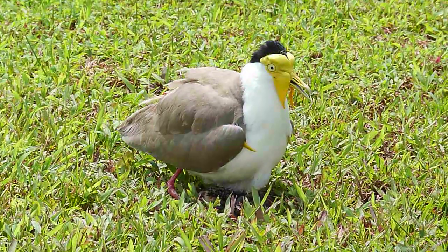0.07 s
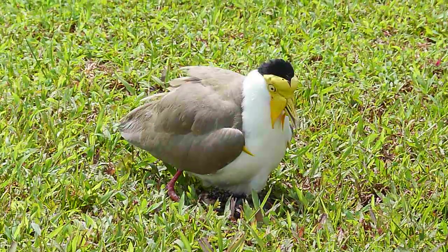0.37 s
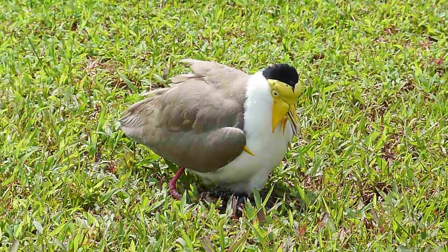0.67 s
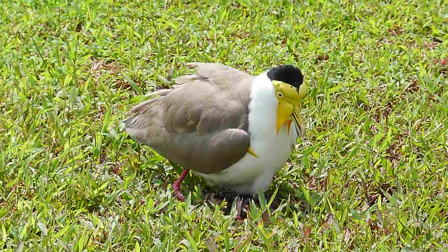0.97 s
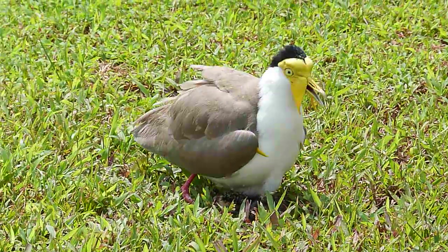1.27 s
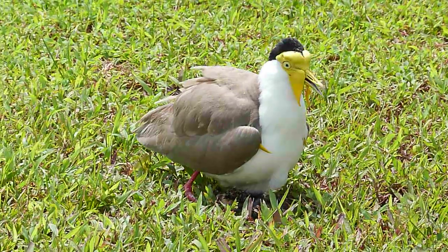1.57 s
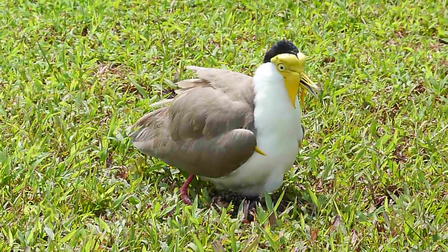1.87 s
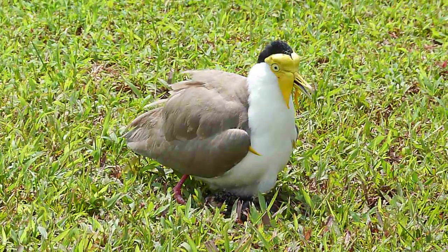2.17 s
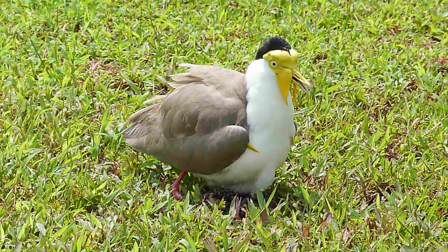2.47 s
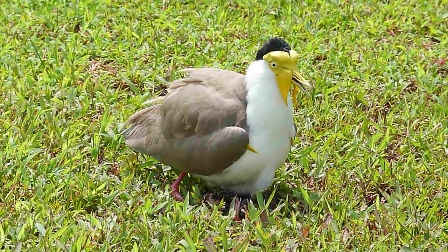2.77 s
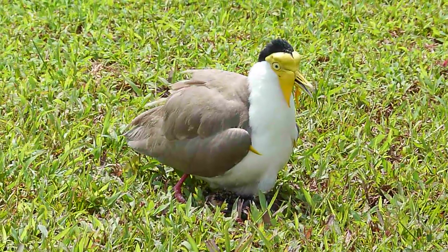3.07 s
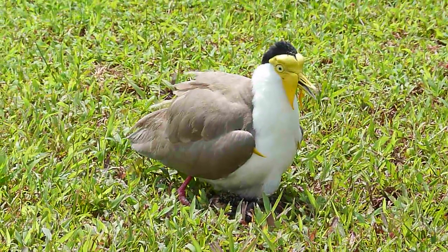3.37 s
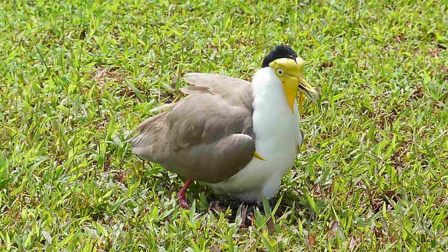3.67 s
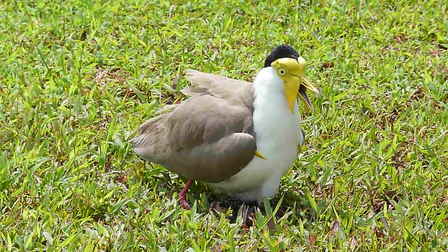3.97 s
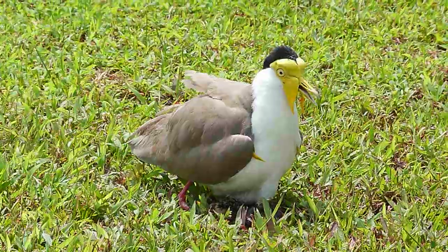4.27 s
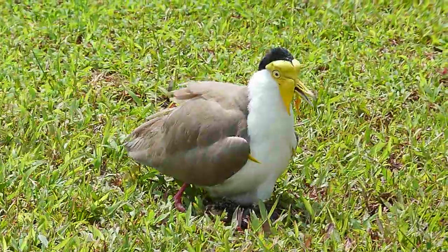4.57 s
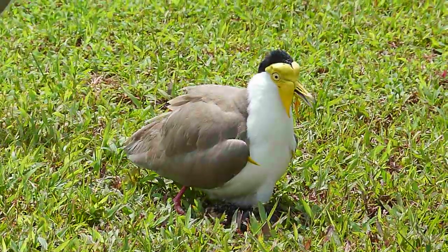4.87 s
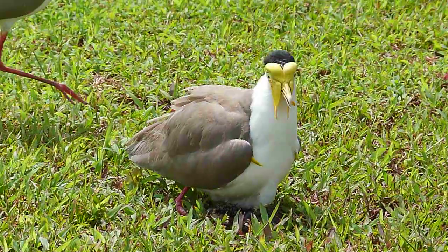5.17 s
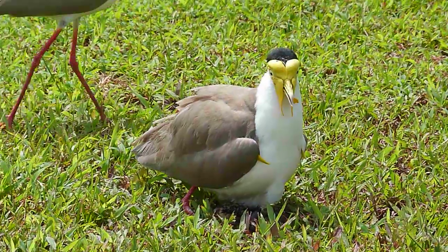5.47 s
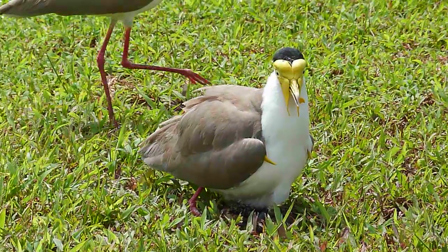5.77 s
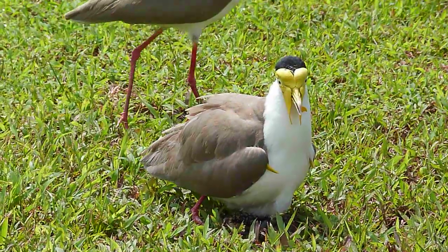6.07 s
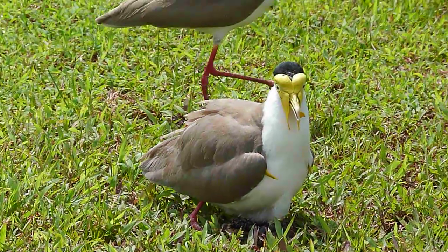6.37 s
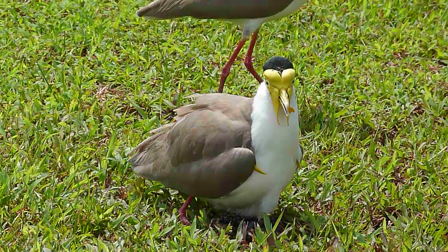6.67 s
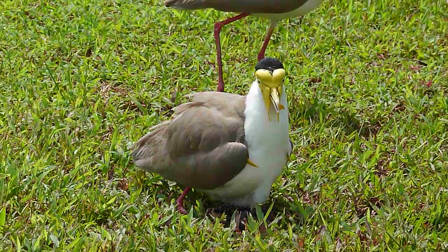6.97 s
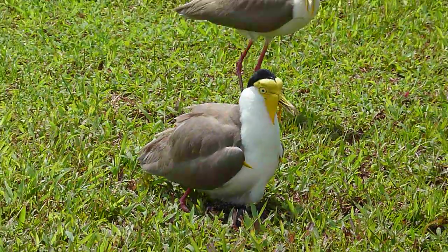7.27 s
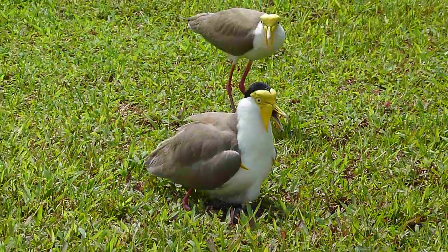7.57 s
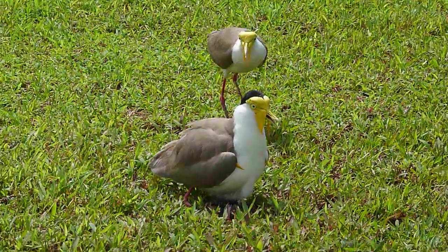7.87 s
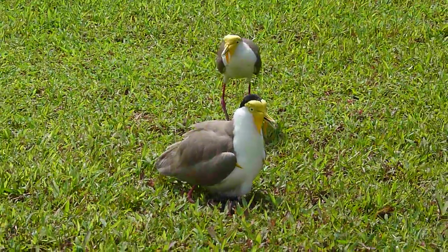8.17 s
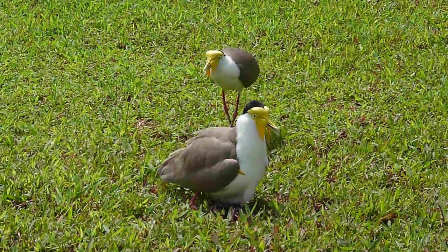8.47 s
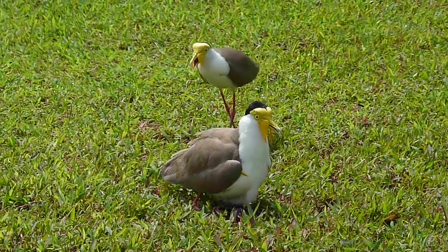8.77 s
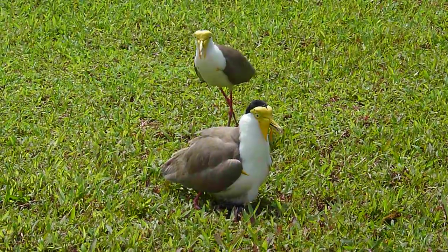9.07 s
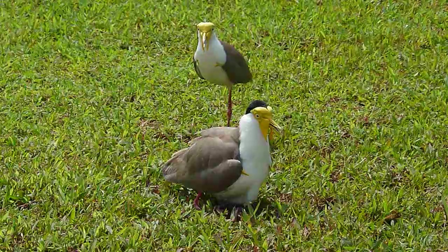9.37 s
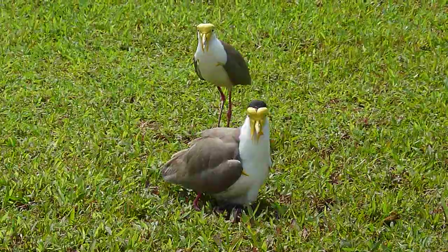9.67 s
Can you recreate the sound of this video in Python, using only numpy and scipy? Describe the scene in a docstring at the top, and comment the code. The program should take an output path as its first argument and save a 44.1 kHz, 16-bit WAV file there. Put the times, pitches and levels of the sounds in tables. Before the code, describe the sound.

Sharp bird chips and thin rising squeals outdoors over a low distant hum, with a few camera clicks and a short zoom whir.

```python
"""A lawn with two masked lapwings, heard from a hand-held camera's stereo microphone.
Close by, one bird's syrinx pulses out sharp double chips that return faintly from trees and walls.
Between them come thin rising squeals and, far off, a cry, peeps, chirps and dry rattles, over traffic
rumble, hiss, the throb of two distant motors and a high whine. Right at the microphone the hand
bumps the camera, its lever clicks and its zoom motor whirs for a moment."""
import sys
import numpy as np
from scipy import signal
from scipy.fft import rfft, irfft
from scipy.io import wavfile

SR = 44100
rng = np.random.default_rng(int(sys.argv[2]) if len(sys.argv) > 2 else 0)


def materialize(psi):
    """Save the field psi as 16-bit PCM at rate SR to the path in sys.argv[1].

    A 1-D psi becomes a single channel; in a 2-D psi each row is a channel.
    """
    bounded = np.clip(np.atleast_2d(psi).T, -1, 1)
    quanta = np.round(bounded * 32767).astype(np.int16)
    wavfile.write(sys.argv[1], SR, quanta)


N = 437472
TIME = np.arange(N) / SR


def undb(db):
    return 10 ** (np.asarray(db) / 20)


def unit(x):
    return x / np.sqrt(np.mean(x ** 2))


def clock(length):
    """Times within one note."""
    return np.arange(int(length * SR)) / SR


def gate(t, length, fade):
    """Soft on and off for a sound that lasts from 0 to length."""
    return np.clip(np.minimum(t, length - t) / fade, 0, 1)


def curve(rows, t=TIME):
    """A level or pitch that moves in straight lines between timed points."""
    return np.interp(t, *np.transpose(rows))


def walk(rate, t=TIME):
    """Random values, rate a second, joined by lines."""
    position = (t - t[0]) * rate
    count = int(position[-1]) + 2
    return np.interp(position, np.arange(count), rng.standard_normal(count))


def turn(hz):
    """Phase of an oscillator."""
    return 2 * np.pi * np.cumsum(hz) / SR


def add(track, s, sound):
    """Mix a sound in at time s."""
    i = max(int(s * SR), 0)
    track[i:i + len(sound)] += sound[:N - i]


def pan(x, left_db):
    """Set a sound left_db louder on the left of the microphone than on the right."""
    return x * undb(np.array([[left_db], [-left_db]]) / 2)


def colour(x, points):
    """Minimum-phase filter through points of f/Hz, gain/dB."""
    hz, db = np.transpose(points)
    size = 4096
    grid = np.maximum(np.fft.rfftfreq(size, 1 / SR), 1)
    gain = undb(np.interp(np.log(grid), np.log(hz), db))
    cepstrum = irfft(np.log(gain))
    cepstrum[1:size // 2] *= 2
    cepstrum[size // 2 + 1:] = 0
    return signal.oaconvolve(x, irfft(np.exp(rfft(cepstrum))))[:len(x)]


def noise(points):
    """Coloured noise of unit power."""
    return unit(colour(rng.standard_normal(N), points))


def air_noise(points, width):
    """Stereo noise of a given colour; width is the side share."""
    mid, side = noise(points), noise(points)
    return mid + width * side * np.array([[1], [-1]])


def bursts(rows, points, fade):
    """Short swells of coloured noise."""
    level = sum(undb(db) * gate(TIME - s, length, fade) for s, length, db in rows)
    return level * noise(points)


# Spectra of the far traffic and of the open-air hiss: f/Hz, level/dB
TRAFFIC_COLOUR = [(20, -42.5), (45, -17.5), (75, -2), (130, -1.5), (200, 3.5), (280, 2), (350, -6),
                  (440, -7), (540, -15), (900, -59)]
HISS_COLOUR = [(200, -9.5), (500, -0.5), (750, 2), (950, 1.5), (1300, -3.5), (2000, -10), (3000, -14),
               (4500, -18), (6000, -21), (7200, -26), (8000, -30.5), (9000, -45.5)]
# Course of the hiss: t/s, level/dB
HISS_COURSE = [(0, -46), (.6, -48.5), (2.6, -49), (5.2, -48.5), (7.6, -50), (8.5, -53), (9.92, -52)]

def outdoors(traffic_db=-40.5, breeze_db=-61):
    """Far traffic rumbles in the centre, under a wider hiss and a light breeze."""
    traffic = air_noise(TRAFFIC_COLOUR, width=.027) * undb(traffic_db + 1.03 * walk(5.5))
    hiss = air_noise(HISS_COLOUR, width=.61) * undb(curve(HISS_COURSE) + walk(5))
    breeze_colour = [(20, -30), (45, -7.5), (75, 5), (130, -1), (300, -34), (1000, -66.5)]
    breeze = air_noise(breeze_colour, width=.66) * undb(breeze_db + 1.5 * walk(7.5))
    return traffic + hiss + breeze


# Pitch of the first distant motor: t/s, f/Hz
MOTOR_PITCH = [(0, 335.5), (5.2, 335.5), (9.92, 330)]
# Strength of each motor: t/s, level/dB
FIRST_MOTOR_LEVEL = [(0, -40.5), (1.4, -39), (2.5, -45), (4.3, -45), (5.2, -39.5), (6.8, -43), (9.92, -42)]
SECOND_MOTOR_LEVEL = [(0, -47.5), (6.8, -46.5), (9.92, -69)]
# Fainter tones of the machinery: f/Hz, level/dB
FAINT_TONES = [(244, -52), (900, -66), (1311, -71)]

def machine_hum(beat_hz=8, low_tone_ratio=.853, low_tone_db=-4):
    """Two distant motors at nearly the same speed beat together; fainter tones drift in and out."""
    hz = curve(MOTOR_PITCH)
    first = undb(curve(FIRST_MOTOR_LEVEL)) * np.sin(turn(hz))
    second = np.sin(turn(hz - beat_hz)) + undb(low_tone_db) * np.sin(turn(hz * low_tone_ratio))
    second *= undb(curve(SECOND_MOTOR_LEVEL))
    tones = sum(undb(db + 3 * walk(2)) * np.sin(turn(tone_hz * (1 + .004 * walk(8))))
                for tone_hz, db in FAINT_TONES)
    return np.sqrt(2) * (first + second + tones)


# Spells of the high whine: t/s, length/s, level/dB
WHINE_SPELLS = [(0.713, 0.41, -67.5), (1.48, 0.66, -64), (2.503, 0.42, -68), (3.622, 0.55, -68.5),
                (4.653, 0.44, -71), (5.593, 0.64, -68), (8.501, 0.28, -68), (9.66, 1, -67)]

def whine(rest_hz=6020, rest_db=-75.5, spell_hz=6010, sag_hz=115.6, flutter=.0049, lower_db=-1.5):
    """A thin tone with its lower octave lingers faintly and swells in spells, sagging in each."""
    def tone(hz, t):
        phase = turn(hz * (1 + flutter * walk(900, t)))
        return np.sqrt(2) * (np.sin(phase) + undb(lower_db) * np.sin(phase / 2))
    out = undb(rest_db + 2.7 * walk(3.7)) * tone(rest_hz, TIME)
    for s, length, db in WHINE_SPELLS:
        t = clock(length)
        add(out, s, gate(t, length, .066) * undb(db) * tone(spell_hz - sag_hz * t / length, t))
    return out


def far_note(t, hz, db, jitter, harmonics_db=(0,)):
    """One note of a distant bird, unsteady in pitch and level."""
    phase = turn(hz * (1 + jitter * walk(1200, t)))
    tone = sum(undb(level) * np.sin(k * phase) for k, level in enumerate(harmonics_db, 1))
    return np.sqrt(2) * gate(t, t[-1], .01) * undb(db + 2 * walk(63, t)) * tone


# Harmonics of the farthest bird, from the first up: level/dB
CRY_HARMONICS = [2.5, 2.5, -13, -16]

def far_cry(start_hz=1635, sag_hz_per_s=500, break_s=.122, fall_hz_per_s=9700, swell_db_per_s=20.5):
    """The farthest bird swells on a nearly level pitch, then breaks roughly downward."""
    out = np.zeros(N)
    t = clock(.17)
    hz = start_hz - sag_hz_per_s * t - fall_hz_per_s * np.maximum(t - break_s, 0)
    jitter = np.where(t < break_s, .011, .07)
    add(out, 0, far_note(t, hz, -53.5 + swell_db_per_s * t, jitter, CRY_HARMONICS))
    return out


# Decay of the diffuse echo around the lawn: delay/s, relative level/dB
ECHO_DECAY = [(0, -2.5), (.012, 16), (.025, -21), (.065, -8), (.11, -0.5), (.17, -9), (.22, -7.5),
              (.28, -11), (.36, -12.5), (.6, -20), (.9, -54)]
# Distinct returns from trees and walls: delay/s, level against the diffuse echo/dB
ECHO_RETURNS = [(.083, -15), (.118, -15.5), (0.226, -20)]

def echo(x, flutter_db=3):
    """Trees and walls scatter sound differently to each side of the microphone; a few returns stand out."""
    t = clock(.99)
    decay = undb(curve(ECHO_DECAY, t) + flutter_db * walk(60, t))
    responses = decay * rng.standard_normal((2, len(t)))
    diffuse = np.array([signal.oaconvolve(x, h / np.linalg.norm(h))[:N] for h in responses])
    returns = np.zeros(N)
    for s, db in ECHO_RETURNS:
        add(returns, s, undb(db) * x)
    return returns + diffuse


# Arched peeps, far off: t/s, length/s, time to the top/s, top f/Hz, level/dB
FAR_PEEPS = [(1.518, 0.11, 0.084, 5120, -63), (3.668, .10, .08, 5180, -61), (4.294, .115, 0.084, 5150, -59),
             (4.84, .05, .012, 5150, -60), (5.408, .06, .025, 5000, -61.5), (8.545, 0.11, 0.074, 5070, -53)]
# Short chirps, far off: t/s, length/s, start f/Hz, end f/Hz, level/dB, flutter/share of pitch
CHIRPS = [(.76, 0.15, 4930, 5050, -62.5, .045), (.91, 0.11, 2000, 1840, -57.5, 0.15),
          (2.16, .03, 3600, 3600, -60, 0.11), (2.28, .03, 2060, 2020, -57, .03),
          (2.37, 0.029, 2210, 2180, -54, .034), (2.47, 0.019, 2160, 2150, -49.5, .033),
          (2.57, .03, 2130, 2120, -57.5, .027), (5.14, 0.036, 3550, 3460, -55, 0.066),
          (5.56, 0.15, 1710, 1940, -56, .016), (6.465, .025, 3040, 3040, -54, 0.06)]

def far_birds(rise_s=.085, fall_s=.036, droop=.26, flank_db=-5.5):
    """Distant birds give peeps that arch in pitch and level, and short fluttering chirps."""
    out = np.zeros(N)
    for s, length, top_s, top_hz, db in FAR_PEEPS:
        t = clock(length)
        flank = ((t - top_s) / np.where(t < top_s, rise_s, fall_s)) ** 2
        add(out, s, far_note(t, top_hz * (1 - droop * flank), db + flank_db * flank, jitter=.021))
    for s, length, start_hz, end_hz, db, flutter in CHIRPS:
        t = clock(length)
        add(out, s, far_note(t, start_hz + (end_hz - start_hz) * t / length, db, flutter))
    return out


# The hand on the camera, right at the microphone: t/s, length/s, level/dB
HAND_BUMPS = [(.82, 0.13, -39), (3.55, 0.24, -44), (4.14, 0.065, -37), (4.85, .06, -39)]
# Spectrum of a bump: f/Hz, level/dB
HAND_COLOUR = [(30, -35), (70, -3), (110, 4), (170, -6.5), (300, -21), (700, -62)]

def hand_bumps():
    """The hand bumps the camera, soft and low."""
    return bursts(HAND_BUMPS, HAND_COLOUR, fade=.025)


def swell(t, length, crest, attack, release):
    """Effort peaks at crest (a share of the length); also gives the progress of the fade, 0-1."""
    top = length * crest
    fall = np.clip((t - top) / (length - top), 0, 1)
    return np.minimum(t / top, 1) ** attack * (1 - fall) ** release, fall


def syrinx(hz, effort, fall, gape_db, treble_db, rasp_db, odd_loss_db,
           open_s=.0033, closed_db=-14.5, gape_hz=4010, gape_width_hz=910):
    """The syrinx snaps open in pulses; a weak pulse is dull, a hoarse one uneven."""
    t = np.arange(len(hz)) / SR
    # a fading note that loses its odd harmonics flips up an octave and sags a little
    flip_db = odd_loss_db * np.minimum(3.6 * fall, 1)
    hz = hz * (1 - .05 * np.clip(flip_db / 10, 0, 1))
    jitter = (.0059 + .06 * undb(rasp_db)) * (1 - fall)
    phase = turn(hz * (1 + jitter * walk(900, t)))
    bright_db = treble_db + closed_db * np.maximum(1 - t / open_s, 0)  # dull until the throat opens
    voice = 0
    for k in range(1, 15):
        loss_db = 2.5 * k * (1 - effort) + (k % 2) * flip_db
        # the open bill strengthens one resonance
        bill_db = gape_db * np.exp(-((k * hz - gape_hz) / gape_width_hz) ** 2)
        shelf_db = bright_db * np.interp(k * hz, [1700, 6000], [0, 1])
        harmonic = np.cos(k * phase - .12 * k ** 2)  # high harmonics lag, which spreads each pulse
        voice += undb(bill_db + shelf_db - loss_db) * harmonic * (k * hz < SR / 4)
    rasp = 2 * undb(rasp_db) * (1 + np.cos(phase)) * (1 - fall) ** 3 * rng.standard_normal(len(t))
    return np.sqrt(2) * effort * (voice + rasp)


# Rising notes that open the near bird's chips:
# t/s, length/s, start f/Hz, end f/Hz, source level/dB, swell exponent, gape/dB, treble/dB, rasp/dB
RISING_NOTES = [(1.2627, 0.025, 487, 700, -23, 0.63, 2, 1, -11),
                (3.086, .0215, 1206, 1440, -10.5, 0.22, -7, -1.5, -26),
                (4.024, 0.02, 1055, 1316, -21.5, 1.6, 4.5, -2.5, -9.5),
                (7.035, 0.014, 1210, 1560, -10.5, 0.23, -8, -3, -10.5),
                (7.619, 0.0178, 1050, 1285, -23, 1.2, 4, -1.5, -11),
                (8.7449, 0.022, 1161, 1536, -15, 0.14, -6.5, 3.5, -10.5)]
# Closing or lone notes that snap open and ring out:
# t/s, length/s, start f/Hz, ring f/Hz, source level/dB, gape/dB, treble/dB, odd-harmonic loss/dB
SNAP_NOTES = [(1.302, 0.012, 655, 1150, -22, 13, -2, 7), (3.122, .022, 1200, 1355, -13.5, 1.5, 3.5, 21),
              (4.057, 0.0082, 676, 1040, -23.5, 7, -6, 22),
              (7.0608, 0.019, 1134, 1421, -13.5, 3, 2.5, -1.5),
              (7.4727, .011, 1000, 1028, -27.5, 8, -1.5, 13), (7.6488, 0.0081, 658, 1006, -23.5, 6, -6, 11),
              (7.7348, 0.0083, 866, 1170, -29, -1, -5, -6.5), (8.781, .02, 1130, 1356, -13.5, 2, 1.5, 39)]
# Resonances of its throat: f/Hz, gain/dB
THROAT_COLOUR = [(300, -40.5), (700, -10), (1270, -17.5), (1480, -18), (1720, -7), (1900, -1), (2200, 4),
                 (2600, -3), (3200, -5), (4200, -3.5), (4700, -4), (5300, -7.5), (6200, -9), (7100, -13),
                 (7700, -21), (9000, -23.5)]

def lapwing_chips(settle_s=.0038, snap_rasp_db=-14):
    """Close by, a rising note and then a snap that settles on one pitch sound through the throat."""
    out = np.zeros(N)
    for s, length, start_hz, end_hz, db, attack, gape_db, treble_db, rasp_db in RISING_NOTES:
        t = clock(length)
        effort, fall = swell(t, length, crest=.68, attack=attack, release=.58)
        hz = start_hz + (end_hz - start_hz) * (t / length) ** 1.35
        add(out, s, undb(db) * syrinx(hz, effort, fall, gape_db, treble_db, rasp_db, odd_loss_db=0))
    for s, length, start_hz, ring_hz, db, gape_db, treble_db, odd_loss_db in SNAP_NOTES:
        t = clock(length)
        effort, fall = swell(t, length, crest=.29, attack=.27, release=.75)
        hz = start_hz + (ring_hz - start_hz) * np.minimum(t / settle_s, 1) ** 3
        add(out, s, undb(db) * syrinx(hz, effort, fall, gape_db, treble_db, snap_rasp_db, odd_loss_db))
    return colour(out, THROAT_COLOUR)


# Thin squeals on the lawn: t/s, rise/s, fall/s, start f/Hz, crack f/Hz, top f/Hz, source level/dB,
# hoarse opening/s, time to the crack/s, roughness of the crack/0-1
SQUEAL_CALLS = [(1.806, 0.26, 0.032, 1494, 1957, 2260, -37, 0.055, .122, .45),
                (3.97, 0.26, 0.043, 1547, 2210, 2464, -42, 0.031, .19, 0.64),
                (6.089, 0.26, 0.036, 1577, 2027, 2383, -38, 0.035, .137, 0.05),
                (7.655, .245, 0.066, 1570, 2024, 2480, -37, 0.039, .13, .3),
                (9.44, 0.3, 0.023, 1560, 2123, 2507, -39.5, 0.058, .16, .35)]
# The beak passes one band, so the third harmonic leads first, then the second: f/Hz, gain/dB
BEAK_COLOUR = [(1500, -30), (2400, -22.5), (3400, -27.5), (4000, -19), (4450, -8), (5000, 1.5), (6150, -1),
               (6700, -15), (7400, -20.5), (9000, -25.5)]

def squeals(attack_s=.077, drop=.12, crack_half_width_s=.011, kink=.016, harmonics_db=(-2, 0, 0, -7)):
    """A tone starts hoarse, climbs through the beak resonance, cracks once and drops at the end."""
    out = np.zeros(N)
    for s, rise_s, fall_s, start_hz, crack_hz, top_hz, db, hoarse_s, crack_s, rough in SQUEAL_CALLS:
        t = clock(rise_s + fall_s)
        fall = np.maximum(t - rise_s, 0) / fall_s
        hz = np.interp(t, [0, crack_s, rise_s], [start_hz, crack_hz, top_hz]) * (1 - drop * fall ** 2)
        after_crack = (t - crack_s) / crack_half_width_s
        hz *= 1 + kink * np.tanh(after_crack) * np.exp(-abs(after_crack) / 5)  # lags, then leaps ahead
        waver = .013 * walk(45, t) + .0066 * walk(160, t) + .011 * walk(1500, t)
        phase = turn(hz * (1 + waver))
        tone = np.sqrt(2) * sum(undb(d) * np.sin(k * phase) for k, d in enumerate(harmonics_db, 1))
        hoarse = np.exp(-(t / hoarse_s) ** 6)
        rasp = np.clip(.032 + .85 * hoarse + rough * np.exp(-after_crack ** 2), 0, 1)
        voice = np.sqrt(1 - rasp ** 2) * tone + 3.4 * rasp * rng.standard_normal(len(t))
        effort_db = -10 * np.maximum(1 - t / attack_s, 0) - 10 * fall
        shimmer_db = 2 * walk(140, t)
        add(out, s, gate(t, t[-1], .0035) * undb(db + effort_db + shimmer_db) * voice)
    return colour(out, BEAK_COLOUR)


# Faint dry rattles, far off: t/s, length/s, level/dB
FAR_RATTLES = [(3.0, 0.096, -60), (3.21, 0.09, -54.5), (3.345, 0.09, -54.5)]
# Their narrow band: f/Hz, level/dB
RATTLE_BAND = [(2400, -35), (3100, -3), (3700, 0), (4500, -25)]

def far_rattles(pulse_hz=123):
    """A narrow band of noise arrives in fast pulses."""
    pulses = (1 + np.cos(2 * np.pi * pulse_hz * TIME)) / np.sqrt(3 / 2)
    return bursts(FAR_RATTLES, RATTLE_BAND, fade=.022) * pulses


# Finger and lever contacts, right at the microphone: t/s, scrape/dB, scrape decay/s, body ring/dB
CONTACTS = [(6.649, -31.5, 0.0042, -43), (6.659, -32, 0.0074, -40.5), (6.711, -38.5, 0.021, -37.5),
            (6.755, -37, 0.0077, -40), (6.824, -35, 0.0055, -40), (6.936, -28, 0.0033, -27.5),
            (6.9397, -17, 0.0013, -19.5), (7.344, -42, 0.0014, -36.5), (7.983, -39, 0.0094, -37.5),
            (8.028, -42.5, 0.0045, -49)]
# Modes of the camera body: f/Hz, t60/s, level/dB
BODY_MODES = [(416.4, 0.061, 2), (1005, 0.013, 5), (1620, 0.03, -6), (2300, 0.011, -15), (2990, 0.019, -5),
              (4190, .02, -11)]
# Colour of a scrape: f/Hz, gain/dB
SCRAPE_COLOUR = [(200, -18), (700, 10.5), (1800, 7.5), (3000, 3), (4000, 1.5), (6000, -6), (9000, -17.5)]

def camera_clicks(bounce_s=.0022, bounce_db=-4):
    """Each contact of finger or lever scrapes briefly and rings the body with a blow and a bounce."""
    scrape, ring = np.zeros(N), np.zeros(N)
    t = clock(.1)
    body = sum(undb(db - 60 * t / t60) * np.sin(2 * np.pi * hz * t) for hz, t60, db in BODY_MODES)
    for s, scrape_db, decay_s, ring_db in CONTACTS:
        add(scrape, s, undb(scrape_db) * np.exp(-t / decay_s) * rng.standard_normal(len(t)))
        add(ring, s, undb(ring_db) * body)
        add(ring, s + bounce_s, undb(ring_db + bounce_db) * body)
    low_cut = signal.butter(2, 220, "highpass", fs=SR, output="sos")  # a small body radiates no bass
    return colour(scrape, SCRAPE_COLOUR) + signal.sosfilt(low_cut, ring)


# Spectrum of the zoom gears, inside the camera: f/Hz, level/dB
GEAR_COLOUR = [(300, -9), (900, 1.5), (1400, 10), (1900, 7), (2900, 7.5), (3700, -4), (4800, 5.5),
               (6500, -2), (8000, -35)]

def zoom_motor(start_s=6.81, stop_s=8.19, start_db=-53, ease_db_per_s=3.2, tick_hz=68, tick_db=-.5):
    """Gears whir with an uneven tick at each turn; the motor starts hard and grows quieter."""
    running = gate(TIME - start_s, stop_s - start_s, fade=.02)
    level = undb(start_db - ease_db_per_s * np.maximum(TIME - start_s, 0))
    cycle = turn(tick_hz * (1 + .05 * walk(30))) / (2 * np.pi) % 1
    flare = np.exp(-cycle / .1) * undb(2.5 * walk(tick_hz))
    tick_colour = [(800, -18.5), (1900, -3), (2700, -1), (4000, -18.5), (9000, -26.5)]
    ticks = unit(colour(rng.standard_normal(N) * flare, tick_colour))
    return (noise(GEAR_COLOUR) + undb(tick_db) * ticks) * level * running


# The near bird across the microphone: f/Hz, left minus right level/dB
NEAR_BALANCE = [(1400, -0.5), (2600, -2), (4200, 3), (7000, 1.5)]

def scene():
    """The lawn from the camera: birds near and far, their echo, handling and the background."""
    chips, squealing, far, cry = lapwing_chips(), squeals(), far_birds(), far_cry()
    near = np.array([colour(chips, [(hz, side * db / 2) for hz, db in NEAR_BALANCE])
                     for side in (1, -1)])
    birds = near + pan(squealing, left_db=.5) + far + cry + far_rattles()
    # foliage scatters the treble more strongly than the low harmonics
    scattered = colour(chips, [(1500, -8), (2600, -2), (4000, 3.5), (7000, 3)])
    # the farther the bird, the greater its share of echo
    echoes = echo(undb(-25.5) * scattered + undb(-13.5) * squealing + undb(-4) * far + undb(-.5) * cry)
    camera = pan(camera_clicks() + zoom_motor() + hand_bumps(), left_db=-.5)
    background = pan(outdoors() + machine_hum() + whine(), left_db=-1.1)
    return birds + echoes + camera + background


# Treble response of the camera: f/Hz, gain/dB
CAMERA_TREBLE = [(7100, 0), (7500, -5), (8000, -20.5), (8600, -17), (9400, -29.5)]

def record(dry, ceiling=.85, top_hz=9000):
    """The camera rounds the highest peaks and keeps nothing of the top octave."""
    rounded = dry / (1 + (dry / ceiling) ** 6) ** (1 / 6)
    dull = np.array([colour(channel, CAMERA_TREBLE) for channel in rounded])
    return signal.sosfilt(signal.ellip(8, .2, 70, top_hz, fs=SR, output="sos"), dull)


dry = scene()
out = record(dry)
materialize(out)
```